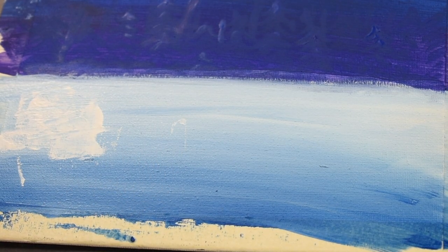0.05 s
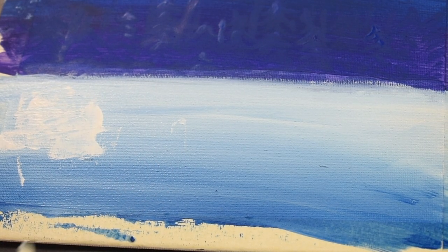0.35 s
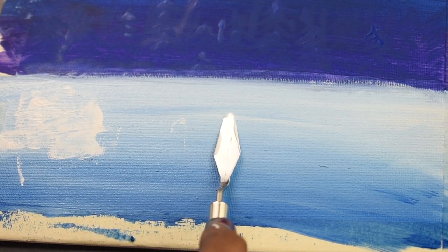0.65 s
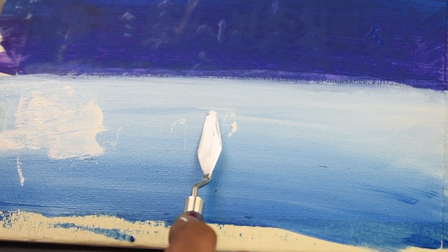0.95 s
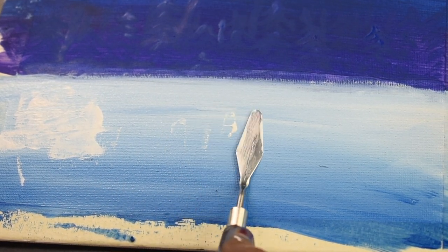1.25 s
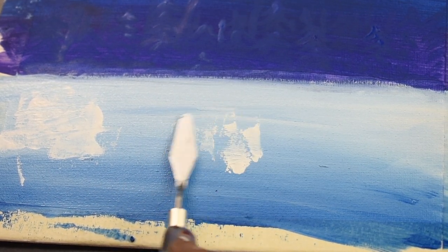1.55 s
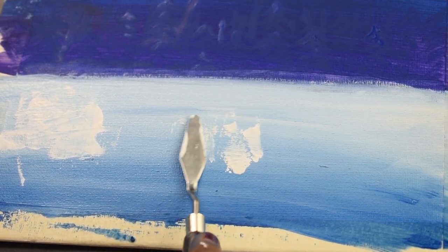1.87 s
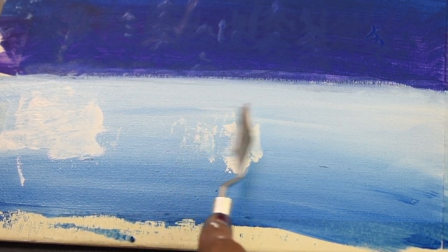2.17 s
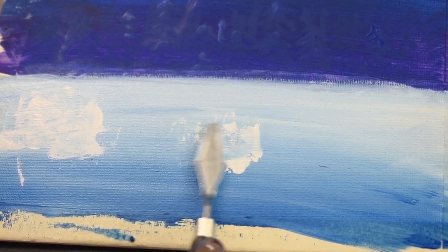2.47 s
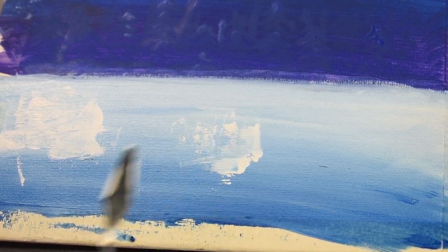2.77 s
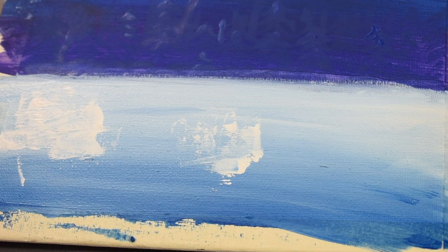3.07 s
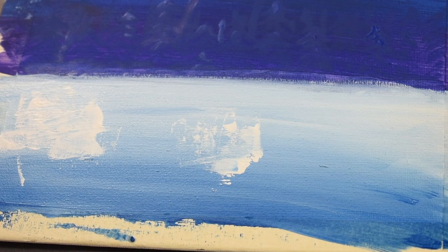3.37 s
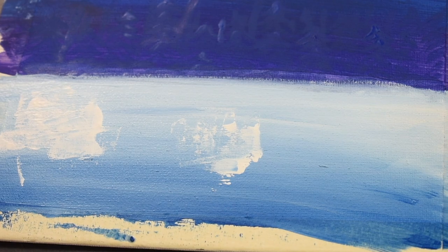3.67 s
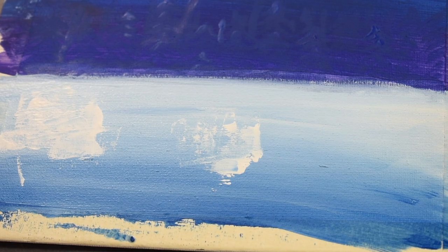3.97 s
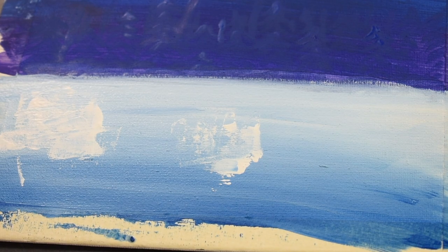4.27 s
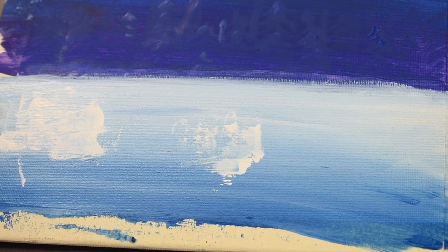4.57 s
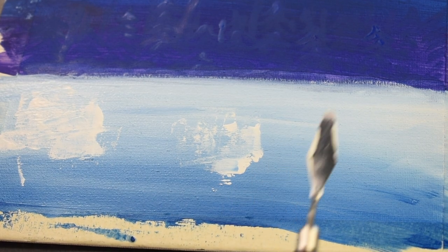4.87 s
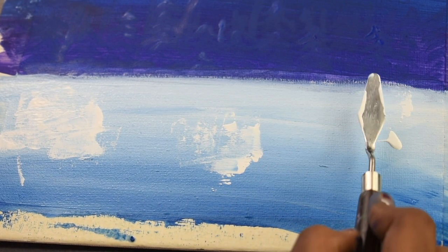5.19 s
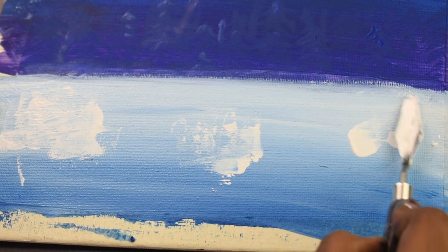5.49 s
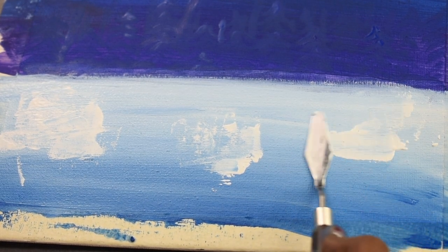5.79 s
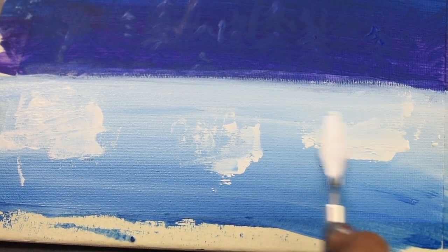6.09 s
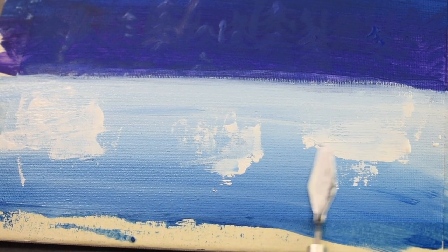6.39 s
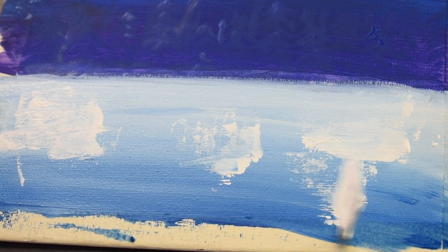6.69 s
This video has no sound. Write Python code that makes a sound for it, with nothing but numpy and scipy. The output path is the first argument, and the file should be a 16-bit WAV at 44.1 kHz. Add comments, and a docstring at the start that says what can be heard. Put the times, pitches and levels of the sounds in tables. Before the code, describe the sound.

A small steel palette knife taps, dabs and scrapes thick paint on canvas, with a few clinks and knocks on a palette midway.

```python
"""A small steel palette knife taps, dabs and drags thick paint over a stretched canvas in a small room.
Halfway through it goes to the palette for more paint: the blade clinks and the board knocks.
Each impact excites the damped modes of the struck body. Strokes are stick-slip friction, showers of
tiny slips over the weave, and after a dab the blade peels out of the tacky paint.
Behind lie steady room noise and, in the second half, a faint thin whistle."""
import sys
import numpy as np
from scipy import signal
from scipy.fft import rfft, irfft
from scipy.io import wavfile
from scipy.ndimage import uniform_filter1d

SR = 44100
rng = np.random.default_rng(int(sys.argv[2]) if len(sys.argv) > 2 else 0)


def to_wav(s):
    """Save 16-bit WAV."""
    ch = np.atleast_2d(s).T  # columns
    pcm = np.round(np.clip(ch, -1, 1) * 32767)  # PCM
    wavfile.write(sys.argv[1], SR, pcm.astype(np.int16))


N = 297234

# A contact's level_db is its treble; its tone (thud_db, body_db, sparkle_db) is relative to that level.
FIRM_DB = -30.5  # level of a firm contact
# Modes of the free blade: frequency_hz, base_width_hz, gain_db
BLADE_MODES = [(850, 170, -13.5), (1353, 35, 2.5), (2604, 105, -3.5), (2990, 25, -12), (3550, 87, -6),
               (3815, 230, -7.5), (4040, 17, -9), (4440, 89, -8), (5500, 53, -6), (6400, 540, -9.5),
               (7090, 37, -6), (8740, 53, -9.5), (9770, 170, -7.5), (12100, 150, -10), (13600, 640, -14)]
# The flat of the blade lands in paint: start_s, level_db, sparkle_db, peel_level_db
DABS = [(1.1169, -38.5, -15, -55), (1.479, -34, 0, -57), (1.6591, -30, -4.5, -68), (2.4435, -35.5, -8, -73),
        (2.5573, -35.5, -8, -53.5), (6.5596, -42, -12, -64)]


def gain_of(db):
    """Amplitude ratio of a level in decibels."""
    return 10 ** (np.asarray(db) / 20)


def unit_rms(x):
    """Normalisation to a root-mean-square value of one."""
    return x / np.sqrt(np.mean(x ** 2) + 1e-20)


def curve_at(points, hz):
    """Interpolation of (frequency_hz, value) points on a logarithmic frequency axis."""
    point_hz, value = np.transpose(points)
    return np.interp(np.log(hz + 1), np.log(point_hz + 1), value)


def add(mix, start_s, sound):
    """Superposition: a sound adds to the mix from start_s on."""
    start = round(start_s * SR)
    sound = sound[max(-start, 0):]
    part = mix[max(start, 0):][:len(sound)]
    part += sound[:len(part)]


def colour(x, points, size=2048):
    """Minimum-phase filtering along a curve of (frequency_hz, gain_db)."""
    log_gain = np.log(gain_of(curve_at(points, abs(np.fft.fftfreq(size, 1 / SR)))))
    response = np.exp(np.conj(signal.hilbert(log_gain)))
    taps = np.fft.ifft(response).real
    return signal.fftconvolve(x, taps[:size // 2])[:len(x)]


def equalise(x, level_db, tone_db, window_s):
    """Band equalisation: two passes bring each band's peak short-time power towards its target."""
    # Treble, thud, body and sparkle bands: low_hz, high_hz
    bands = [(2000, 6000), (300, 900), (900, 2000), (6000, 16000)]
    filters = [signal.butter(3, band, "band", fs=SR, output="sos") for band in bands]
    centre_hz = np.sqrt(np.prod(bands, axis=1))
    target_db = level_db + np.r_[0, tone_db]
    x = signal.sosfilt(signal.butter(4, 145, "high", fs=SR, output="sos"), x)
    for _ in range(2):
        split = np.array([signal.sosfilt(sos, x) for sos in filters])
        power = uniform_filter1d(split ** 2, round(window_s * SR), axis=1)
        peak_db = 10 * np.log10(power.max(1) + 1e-20)
        x = colour(x, sorted(zip(centre_hz, target_db - peak_db)))
    return x


def reverberate(x, wet_db, early_s=0.004, tail_onset_s=0.0023, count=14):
    """Early reflections off easel and table, then a diffuse tail whose highest treble dies first."""
    # Reverberation time of the room: frequency_hz, t60_s
    decay_times = [(200, 0.2), (600, 0.16), (1200, 0.19), (3000, 0.19), (7000, 0.18), (15000, 0.13)]
    t = np.arange(SR // 3) / SR
    scatter = rng.standard_normal(len(t)) * (rng.random(len(t)) < .12) * (t > tail_onset_s)
    hz, frame_s, spectra = signal.stft(scatter, SR, nperseg=256)
    decay = gain_of(-60 * frame_s / curve_at(decay_times, hz)[:, None])
    tail = signal.istft(spectra * decay, SR, nperseg=256)[1][:len(t)]
    delay_s = .0006 + early_s * rng.exponential(1, count)
    strength = rng.choice([-1, 1], count) * np.exp(-delay_s / (2 * early_s))
    early = np.zeros(len(t))
    early[(delay_s * SR).astype(int) % len(t)] = strength
    response = gain_of(wet_db) * (tail / np.linalg.norm(tail) + early / np.linalg.norm(early))
    response[0] += 1  # direct sound
    return signal.fftconvolve(x, response)


def ring(modes, click_db, damping, detune=0.0067, grit=0.15, grit_s=0.00086):
    """Modal impulse response: a gritty click and damped sinusoids that shift with the point of contact."""
    t = np.arange(SR // 8) / SR
    hz, base_width_hz, gain_db = np.transpose(modes)[:, :, None]
    hz = hz * (1 + detune * rng.standard_normal(hz.shape))
    decay_per_s = np.pi * base_width_hz * damping
    amplitude = rng.choice([-1, 1], hz.shape) * gain_of(gain_db) * 2 * decay_per_s / SR
    ringing = (amplitude * np.exp(-decay_per_s * t) * np.cos(2 * np.pi * hz * t)).sum(0)
    click = (t == 0) + grit * rng.standard_normal(len(t)) * np.exp(-t / grit_s)
    click = signal.sosfilt(signal.butter(2, 480, "high", fs=SR, output="sos"), click)
    return ringing + gain_of(click_db) * click


def room_noise(level_db=-55.5):
    """Spectrally shaped Gaussian noise: a steady low hum of air with a soft hiss above it."""
    # Noise spectrum: frequency_hz, relative_density_db
    spectrum = [(15, -50), (25, -21), (80, -22), (212, -4), (326, -9.5), (363, -6.5), (575, -5.5),
                (734, -8), (911, -8), (1330, -9.5), (2050, -11.5), (2410, -10), (2990, -12), (8140, -18.5),
                (16000, -24)]
    gain = gain_of(curve_at(spectrum, np.fft.rfftfreq(N, 1 / SR)))
    noise = irfft(rfft(rng.standard_normal(N)) * gain, N)
    return gain_of(level_db) * unit_rms(noise)


def slips(speed, per_s, spread_db):
    """A Poisson train of uneven impulses whose energy is proportional to the blade's speed."""
    chance, draw, direction = rng.random((3, SR))[:, :len(speed)]
    size = gain_of(spread_db * np.minimum(-np.log(draw + 1e-9), 4))
    return np.sqrt(speed) * size * np.sign(direction - .5) * (chance < per_s / SR)


def drag(peak_s, rise_s, fall_s, level_db, tone_db, free_db, wet_db=0, tack_db=-11, tack_hz=10000):
    """Stick-slip friction shakes the blade as threads of paint snap; returns start time and sound."""
    t = np.arange(-2 * rise_s, 3 * fall_s, 1 / SR)
    speed = np.exp(-2 * (abs(t) / np.where(t < 0, rise_s, fall_s)) ** 1.76)
    # Modes of the pressed blade: frequency_hz, base_width_hz, gain_db
    pressed_modes = [(590, 150, -16), (976, 110, -15.5), (1127, 80, -3), (1246, 64, -5), (1430, 67, -5),
                     (1493, 31, -5), (1740, 21, -1), (2350, 133, -2.5), (2500, 42, 2), (2810, 115, -1),
                     (3056, 64, -3), (3350, 150, -3.5), (3796, 44, -3.5), (4200, 160, -3.5),
                     (4600, 130, -11.5), (5160, 68, 0.5), (5600, 52, -3.5), (7400, 110, -7.5),
                     (8910, 58, -4.5), (11800, 140, -7)]
    pressed = ring(pressed_modes, click_db=-25, damping=1.33, detune=0.0012)
    free = ring(BLADE_MODES, click_db=-17, damping=1.6)
    rasp = signal.fftconvolve(slips(speed, per_s=3000, spread_db=5), pressed + gain_of(free_db) * free)
    highpass = signal.butter(2, tack_hz, "high", fs=SR, output="sos")
    tack = signal.sosfilt(highpass, slips(speed, per_s=1400, spread_db=3.5))
    lighter_db = -55 - level_db  # the fizz of tacky paint takes over in light strokes
    add(rasp, 0, gain_of(tack_db + lighter_db) * tack)
    return peak_s - 2 * rise_s, equalise(reverberate(rasp, wet_db), level_db, tone_db, window_s=0.014)


def scrapes():
    """Friction of the edge on the weave: less pressure gives a thinner, brighter rasp."""
    # Edge strokes: peak_s, rise_s, fall_s, level_db, body_db, free_db (high when only the tip touches)
    strokes = [(0.432, 0.022, 0.021, -52, -8, 8), (0.836, 0.014, 0.027, -44, -3, 17),
               (1.4, 0.02, 0.0043, -46, -1.5, 7), (2.08, 0.014, 0.016, -40.5, -5, -11),
               (2.127, 0.02, 0.011, -28.5, -4.5, -10), (2.222, 0.0077, 0.016, -33, 6.5, -8),
               (2.266, 0.028, 0.015, -35, -15, -1), (2.319, 0.0098, 0.01, -30.5, -0.5, -2),
               (2.461, 0.024, 0.013, -30, -1.5, -0.5), (6.155, 0.034, 0.016, -46, -9.5, 2)]
    out = np.zeros(N)
    for peak_s, rise_s, fall_s, level_db, body_db, free_db in strokes:
        tone_db = body_db - 13.5, body_db, -5.5 + 0.16 * (FIRM_DB - level_db)
        add(out, *drag(peak_s, rise_s, fall_s, level_db, tone_db, free_db))
    return out


def impact(modes, level_db, tone_db, click_db, damping, wet_db, cutoff_hz):
    """Impulsive excitation of body and room: light blows are more click than ring; paint dulls the top."""
    struck = ring(modes, click_db + 0.59 * (FIRM_DB - level_db), damping)
    lowpass = signal.butter(2, cutoff_hz, fs=SR, output="sos")
    softened = signal.sosfilt(lowpass, reverberate(struck, wet_db))
    return equalise(softened, level_db, tone_db, window_s=0.025)


def tip_taps():
    """Free vibration of the blade after its tip taps; in light taps the cloth's thud counts for more."""
    # The tip touches the canvas: start_s, level_db, body_db, sparkle_db
    taps = [(0.6951, -30, -1, -3), (0.8018, -52.5, 3.5, -3), (0.9923, -38, -3.5, -9), (1.2771, -51, -5, -7),
            (1.819, -34.5, -7.5, -5), (2.0367, -50.5, 3, -7), (5.1089, -32.5, -6, -0.5),
            (5.2845, -36, -1.5, 0), (5.3846, -45, -10, -2.5), (5.5978, -41.5, -4, -8),
            (5.9225, -56, -0.5, -6), (6.302, -57, 3, 8), (6.3746, -48.5, -7, -7), (6.4349, -54.5, -14, 5)]
    out = np.zeros(N)
    for start_s, level_db, body_db, sparkle_db in taps:
        tone_db = -18 + 0.24 * (FIRM_DB - level_db), body_db, sparkle_db
        tap = impact(BLADE_MODES, level_db, tone_db, click_db=-27.5, damping=1.5, wet_db=-2, cutoff_hz=14640)
        add(out, start_s, tap)
    return out


def smears(tone_db=(-16, -5, 3.5), rise_share=0.41):
    """Wet friction: paint spreads under the blade with a soft fizz that swells and fades."""
    # Light glides through paint: peak_s, length_s, level_db
    glides = [(1.055, 0.011, -60), (1.925, 0.036, -54), (2.416, 0.013, -50.5), (2.607, 0.011, -56),
              (4.098, 0.11, -68), (5.382, 0.028, -51.5), (5.654, 0.042, -57.5), (5.93, 0.096, -56.5),
              (6.043, 0.07, -55.5), (6.248, 0.046, -56), (6.428, 0.037, -54.5), (6.63, 0.05, -54.5),
              (6.726, 0.055, -51.5)]
    out = np.zeros(N)
    for peak_s, length_s, level_db in glides:
        rise_s, fall_s = rise_share * length_s, (1 - rise_share) * length_s
        add(out, *drag(peak_s, rise_s, fall_s, level_db, tone_db,
                       free_db=-0.5, wet_db=-1.5, tack_db=-4, tack_hz=12000))
    return out


def flat_dabs():
    """Cushioned impact: the more sparkle the paint absorbs, the more thud and body and the less ring."""
    # Modes of the blade flat on the canvas: frequency_hz, base_width_hz, gain_db
    modes = [(504, 23, -4), (750, 43, -17), (1154, 29, 2), (1302, 63, -2.5), (1726, 77, -10.5),
             (2360, 16, -25), (2542, 43, -5.5), (3140, 35, -6.5), (3440, 42, -3), (3800, 110, -5.5),
             (3900, 560, -19.5), (4144, 60, 0.5), (5310, 120, -8), (5660, 90, -7), (7200, 43, -12),
             (9200, 210, -11.5), (10000, 280, -16), (11600, 100, -28)]
    out = np.zeros(N)
    for start_s, level_db, sparkle_db, _ in DABS:
        tone_db = -15 - 0.53 * sparkle_db, -2.5 - 0.2648 * sparkle_db, sparkle_db
        click_db = -21 - 0.4 * sparkle_db
        dab = impact(modes, level_db, tone_db, click_db, damping=1.32, wet_db=-4, cutoff_hz=10700)
        add(out, start_s, dab)
    return out


def peels(tone_db=(-6, 3, 5), delay_s=0.077, length_s=0.014):
    """Adhesion gives way: just after each dab the blade leaves the paint with a short sticky smack."""
    out = np.zeros(N)
    for dab_s, _, _, level_db in DABS:
        add(out, *drag(dab_s + delay_s, length_s / 2, length_s / 2, level_db, tone_db, free_db=-3))
    return out


def rubs(tone_db=(2, 2, -9)):
    """Sliding friction: the blade works paint on the palette with a dull, low rub."""
    # Mixing strokes: peak_s, length_s, level_db
    strokes = [(3.109, 0.016, -52), (3.764, 0.008, -57.5), (4.229, 0.11, -56), (4.444, 0.04, -58)]
    out = np.zeros(N)
    for peak_s, length_s, level_db in strokes:
        add(out, *drag(peak_s, length_s / 2, length_s / 2, level_db, tone_db, free_db=-9))
    return out


def clinks():
    """Hard impact excites high modes: bare steel on the palette sounds bright and dry."""
    # The blade meets the palette: start_s, level_db, thud_db, body_db, sparkle_db
    contacts = [(3.2022, -25, -11.5, -10, -3.5), (3.2162, -34, -5, -6.5, 0.5),
                (3.3595, -37, -12, -7.5, -4.5), (3.6851, -53, -3, 10.5, -3), (3.8567, -34, -12, -1, -2),
                (4.4147, -47, 4, -1.5, 6)]
    # Modes of the blade on the palette: frequency_hz, base_width_hz, gain_db
    modes = [(685, 44, 3), (1443, 26, -9.5), (1950, 72, -9.5), (2520, 110, -2), (2770, 81, -2.5),
             (3960, 200, -7), (4540, 110, -5.5), (5480, 46, -2.5), (6520, 130, -1), (7160, 80, 1),
             (9830, 190, -3), (10650, 180, -5.5), (13800, 570, -2.5), (14500, 400, -7)]
    out = np.zeros(N)
    for start_s, level_db, *tone_db in contacts:
        clink = impact(modes, level_db, tone_db, click_db=-26, damping=1.43, wet_db=-6.5, cutoff_hz=17000)
        add(out, start_s, clink)
    return out


def knocks():
    """Plate modes of the palette sound as it bumps its support: the lighter the knock, the duller."""
    # Bumps against the support: start_s, level_db
    bumps = [(3.374, -40), (3.5263, -24.5), (3.704, -40), (3.7517, -53), (3.866, -32.5), (4.0266, -43)]
    # Modes of the board: frequency_hz, base_width_hz, gain_db
    modes = [(159, 14, -15.5), (233, 14, -7), (492, 25, -1), (566, 75, 0.5), (726, 140, -7.5),
             (1023, 170, 2), (1160, 100, 0), (1240, 30, -9.5), (1560, 69, -8.5), (1740, 63, -12),
             (2210, 180, -6.5), (2500, 140, -16), (2910, 410, -8.5), (4540, 210, -8.5), (5360, 105, -4),
             (6900, 160, -9.5), (8400, 300, -34)]
    out = np.zeros(N)
    for start_s, level_db in bumps:
        lighter_db = FIRM_DB - level_db
        tone_db = -1.5 + 0.13 * lighter_db, 4.5 + 0.07 * lighter_db, -5 - 0.45 * lighter_db
        knock = impact(modes, level_db, tone_db, click_db=-14.5, damping=1.23, wet_db=-3.5, cutoff_hz=10000)
        add(out, start_s, knock)
    return out


def whistle(half_width_hz=35):
    """Narrow-band noise about a gliding carrier is heard as a faint, fuzzy whistle."""
    # Course of the whistle: time_s, pitch_hz, level_db
    course = [(3.9, 2520, -88), (4.4, 2495, -72), (4.9, 2480, -64.5), (5.6, 2450, -65), (5.899, 2400, -66),
              (6.1, 2350, -66), (6.4, 2400, -80), (6.74, 2500, -64)]
    time_s, pitch_hz, level_db = np.transpose(course)
    t = np.arange(N) / SR
    lowpass = signal.butter(2, half_width_hz, fs=SR, output="sos")
    flutter = signal.sosfilt(lowpass, rng.standard_normal((2, N)))
    phase = 2 * np.pi * np.cumsum(np.interp(t, time_s, pitch_hz)) / SR
    tone = unit_rms(flutter[0] * np.cos(phase) + flutter[1] * np.sin(phase))
    return gain_of(np.interp(t, time_s, level_db)) * tone


def scene():
    """Superposition of knife on canvas, knife on palette and the quiet room, in one channel."""
    canvas = scrapes() + tip_taps() + smears() + flat_dabs() + peels()
    palette = rubs() + clinks() + knocks()
    return (room_noise() + canvas + palette + whistle())[None]


def record(dry, cutoff_hz=16100):
    """The microphone's frequency response rounds off the highest treble; a low-pass limits the band."""
    heard = colour(dry[0], [(20, -0.5), (13000, 0.5), (14300, -1.5), (16000, -5.5)])
    lowpass = signal.firwin(255, cutoff_hz, window=("kaiser", 8), fs=SR)
    return signal.oaconvolve(heard, lowpass, "same")[None]


dry = scene()
out = record(dry)
to_wav(out)
```